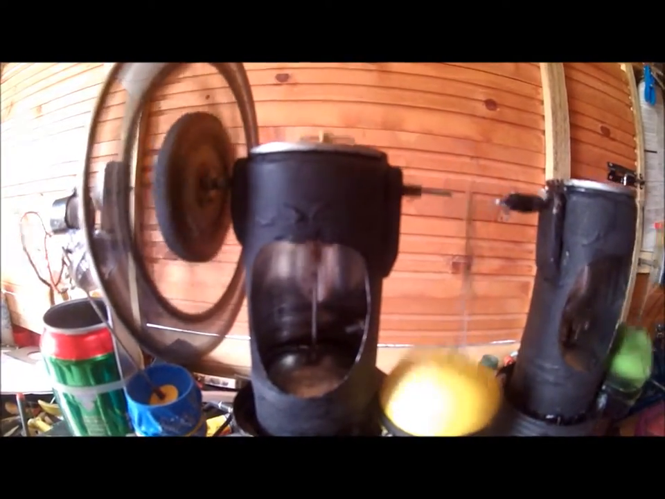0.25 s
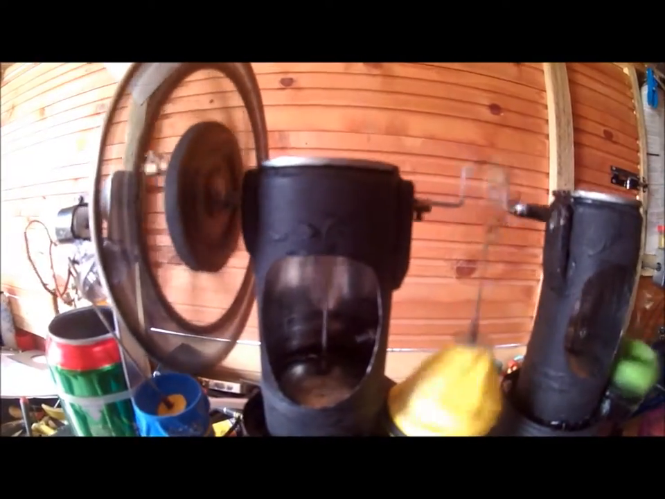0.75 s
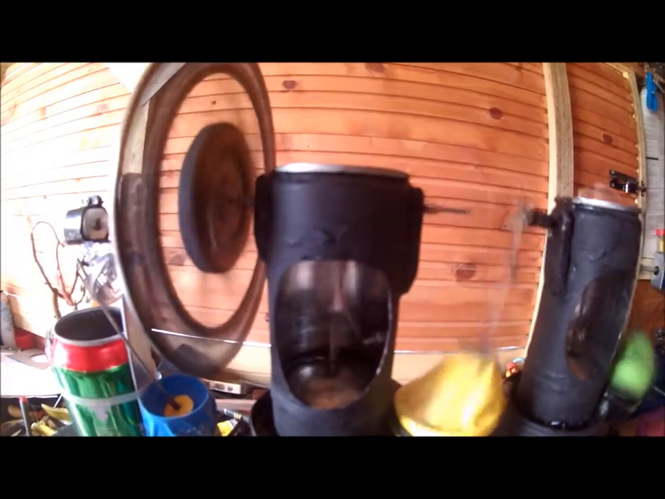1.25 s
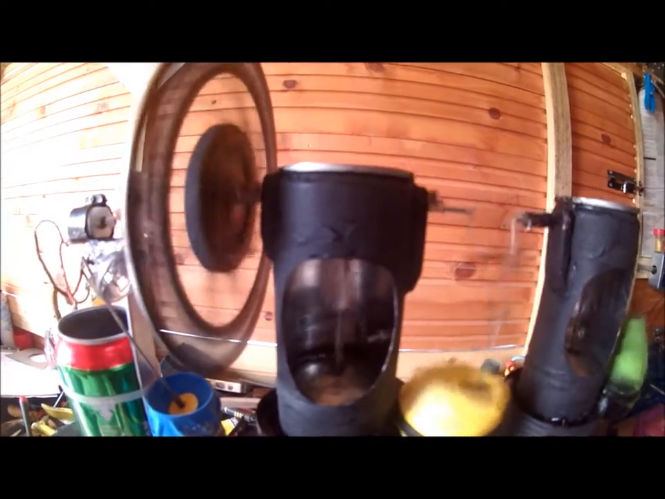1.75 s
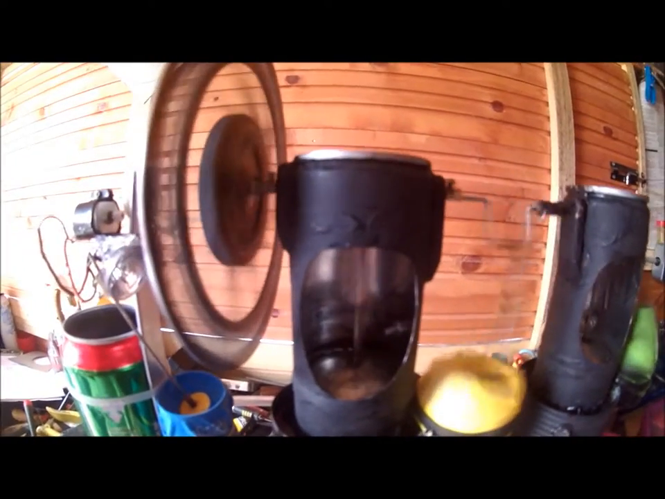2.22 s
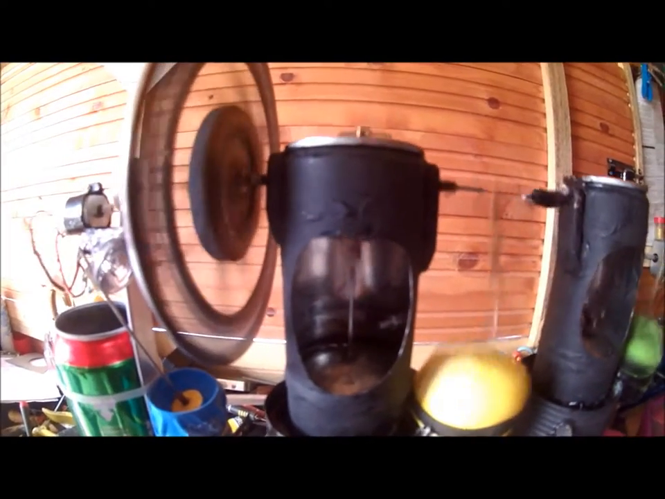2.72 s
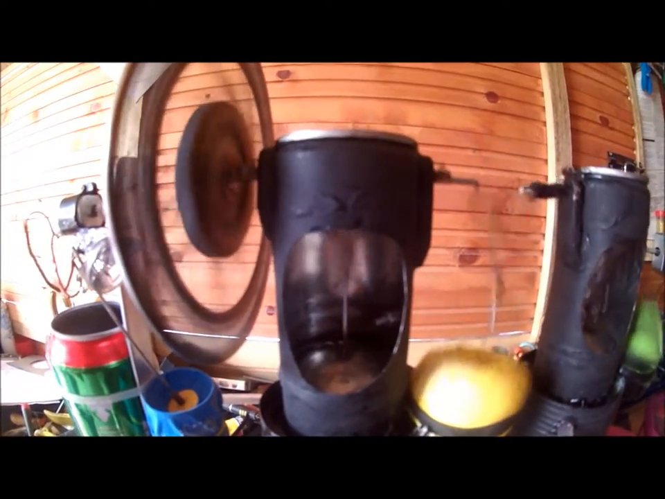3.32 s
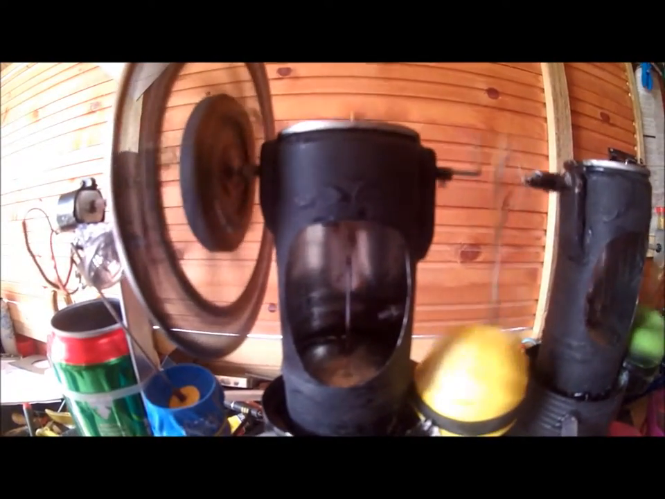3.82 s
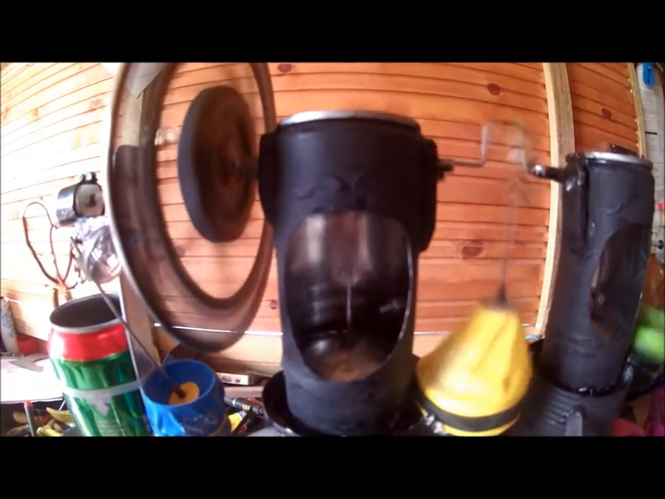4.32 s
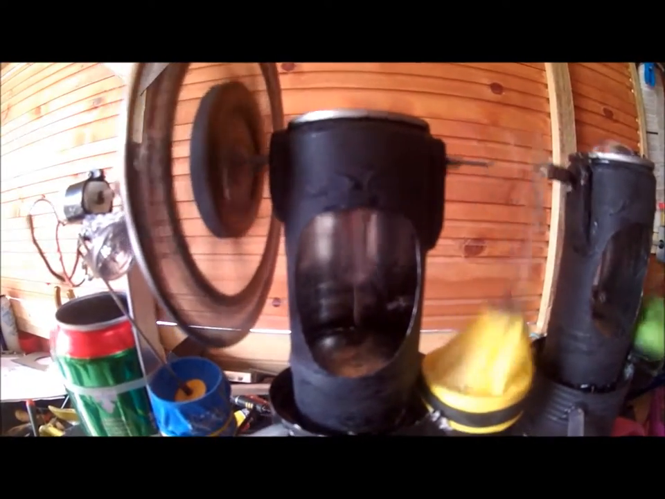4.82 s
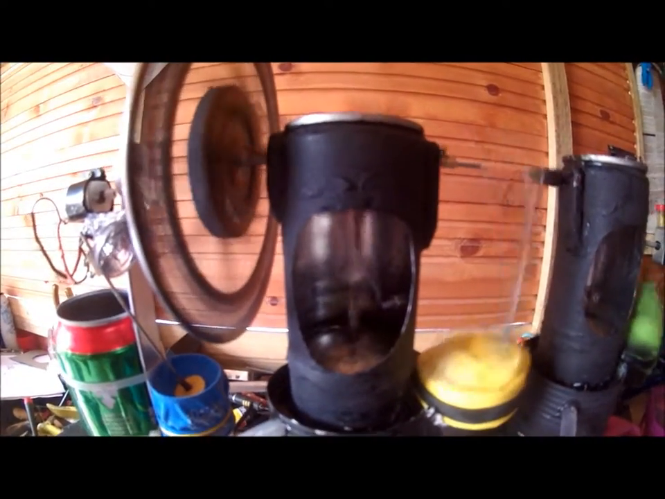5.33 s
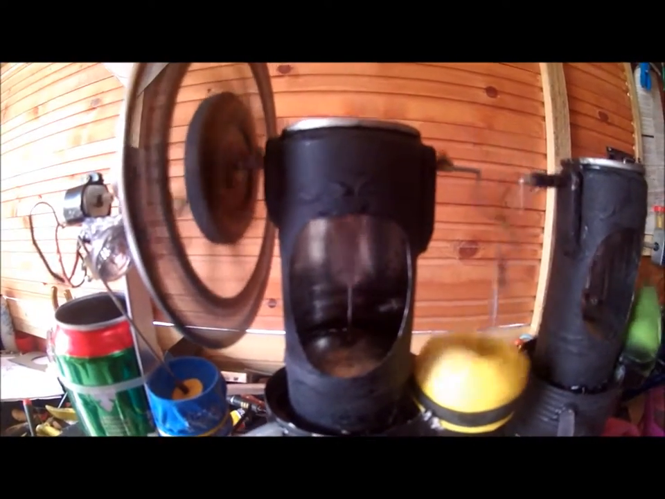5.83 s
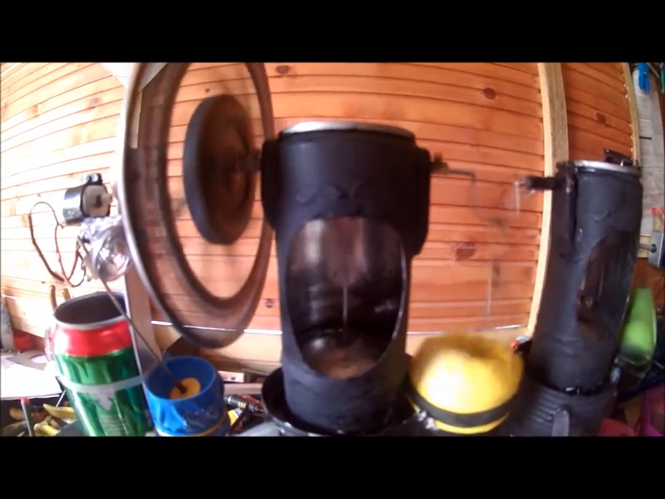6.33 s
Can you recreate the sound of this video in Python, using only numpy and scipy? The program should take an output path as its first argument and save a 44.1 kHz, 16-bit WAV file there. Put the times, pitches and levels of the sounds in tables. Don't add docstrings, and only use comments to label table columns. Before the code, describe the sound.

A small hot-air engine made from tin cans runs on a bench in a wooden shed. Six times a second a hard, tinny slam lands as a tight flurry of blows, with a dry crank tick and loose lid and wire rattle between. The cheap microphone sits very close, so the slams sound crunchy and overloaded; bass is thin and the room barely audible.

```python
import sys
import numpy as np
from scipy import signal
from scipy.fft import rfft, irfft
from scipy.io import wavfile
from scipy.ndimage import uniform_filter1d, minimum_filter1d

SR = 44100
rng = np.random.default_rng(int(sys.argv[2]) if len(sys.argv) > 2 else 0)


def boost_factor(decibels):
    exponent = np.asarray(decibels, float) / 20
    return 10 ** exponent


def int16_out(signal):
    q = np.round(np.clip(np.atleast_2d(signal).T, -1, 1) * 32767)
    wavfile.write(sys.argv[1], SR, q.astype(np.int16))


N = 289296

# turns counted, crank tick t/s
CRANK = [(0, -.0815), (5, .6935), (10, 1.4668), (15, 2.2402), (20, 3.0128), (23, 3.4803), (25, 3.7928),
         (30, 4.5843), (33, 5.057), (38, 5.8416), (43, 6.626)]
TICKS = np.interp(np.arange(CRANK[-1][0] + 1), *np.transpose(CRANK))
# first hard blow t/s, flurry
# length/s, shove level/dB, can ring f/Hz, lid level beside the can/dB
SLAM_ROWS = [(0.0161, 0.0086, -29.5, 1342, -7.5), (0.1723, 0.0152, -31, 1244, -14.5),
             (0.3284, 0.012, -42, 1010, -4), (0.4798, 0.013, -37.5, 1310, -15),
             (0.6384, 0.0115, -33, 1130, -8), (0.7911, 0.011, -32.5, 1400, 0.5),
             (0.9441, 0.0148, -32.5, 1367, 1), (1.1023, 0.0126, -43, 1247, -17.5),
             (1.2521, 0.01, -33, 1305, 2.5), (1.4083, 0.013, -31.5, 1378, 4),
             (1.5622, 0.015, -33.5, 1332, -1), (1.7167, 0.0142, -40.5, 1060, 0.5),
             (1.8719, 0.0133, -41, 1060, -2), (2.0268, 0.0154, -42, 1166, -5.5),
             (2.1811, 0.018, -36.5, 1325, 3), (2.336, 0.013, -33, 1315, -6.5),
             (2.4906, 0.0147, -39, 1230, 0), (2.646, 0.0123, -42.5, 1310, -1),
             (2.7987, 0.0144, -39, 1380, 0), (2.9581, 0.0154, -32.5, 1274, -0.5),
             (3.1113, 0.0132, -31, 1270, -5),
             (3.2706, 0.0148, -33.5, 1254, -6.5), (3.4253, 0.0113, -28.5, 1380, -10),
              (3.5777, 0.0125, -35.5, 1400, -3.5), (3.7345, 0.0155, -36, 1398, -7),
              (3.8944, 0.0132, -37, 1028, -7.5), (4.051, 0.0143, -36, 1319, -17.5),
              (4.2116, 0.0165, -37.5, 1060, -2.5), (4.3635, 0.0168, -39.5, 1248, -6.5),
              (4.528, 0.0171, -30.5, 1240, -4.5), (4.6804, 0.019, -36, 1052, -0.5),
              (4.8434, 0.0124, -35, 1308, -4.5), (4.9983, 0.011, -37, 1318, -9),
              (5.16, 0.0144, -32, 1290, -7), (5.3128, 0.018, -37, 1060, -10.5),
              (5.468, 0.0136, -34.5, 1267, -13), (5.6291, 0.017, -35.5, 1060, -2.5),
              (5.788, 0.01, -29.5, 1360, -8), (5.9422, 0.0159, -40, 1308, -7),
              (6.0972, 0.0115, -38, 1074, -1), (6.2554, 0.0154, -35, 1090, 0),
              (6.409, 0.019, -34, 1093, -5)]
SLAMS = SLAM_ROWS
MEAN_SHOVE_DB = -36


def flurries():
    # place/share of its length, level/dB, extra lid level/dB, wire jingle level/dB
    flurry_blows = [
        (-.38, -17, 1.5, -20),
        (0, 0, 2.5, -11.5),
        (0.451, 1, 1.5, -8),
        (0.899, -2, -1.5, -26),
        (1.501, -12.5, 0, -22.5),
    ]
    off_centre_hz = [1060, 1230, 1310, 1380]
    # t/s, level/dB, ring f/Hz
    stray_knocks = [(0.0754, -8.5, 1230), (0.2355, -10.5, 1170), (1.129, -11.5, 1310), (4.35, -7, 1290),
                    (4.6684, -8.5, 1330), (5.377, -12, 1122), (5.5321, -8.5, 1265)]
    place_scatter, blow_scatter_db, jingle_scatter_db = 0.14, 4.5, 10
    blow_per_shove = 0.35
    jingle_per_lid = -0.53
    touch_gain, first_loss = 1.6, 1.3
    rows = []
    all_draws = rng.random((len(SLAMS), len(flurry_blows), 4)) - 0.5
    for (s, length, shove_db, can_hz, lid_db), draws in zip(SLAMS, all_draws):
        for (place, db, extra_db, jingle_db), u in zip(flurry_blows, draws):
            blow_s = s + length * (place + place_scatter * u[0])
            blow_db = db + blow_per_shove * (shove_db - MEAN_SHOVE_DB) + blow_scatter_db * u[1]
            if place < 0:
                blow_db += touch_gain * s
            if place == 0:
                blow_db -= first_loss * s
            hard = db > -2
            hz = can_hz if hard else off_centre_hz[int((u[2] + 0.5) * len(off_centre_hz))]
            wire_db = jingle_db + jingle_per_lid * (lid_db + 5.5) + jingle_scatter_db * u[3]
            rows.append((blow_s, blow_db, hz, lid_db + extra_db, wire_db))
    return rows + [(s, db, hz, -9, -20) for s, db, hz in stray_knocks]


def blows():
    out, rows = np.zeros(N), flurries()
    for (s, db, hz, lid_db, jingle_db), u in zip(rows, rng.random((len(rows), 4))):
        t60 = np.interp(db, [-8, -1], [0.02, 0.04])
        can = ring(hz, t60, 0.0005, u[0])
        lid = boost_factor(lid_db) * ring(1850 + 270 * u[1] ** 2, 0.013, 0.00074, u[2])
        tin = (can + lid) / np.hypot(1, boost_factor(lid_db))
        wire = ring(2800 + 800 * u[3], 0.0091, 0.00097, u[1])
        wire += 1.62 * rng.standard_normal(len(wire)) * ring(11500, 0.016, 0.00029)
        add(out, s - 0.0014, boost_factor(db - 2) * (tin + boost_factor(jingle_db) * wire))
    return out


def clicks():
    # t/s, click level/dB
    lid_play = [
        (0, -21),
        (3.1, -19),
        (3.4, -36.5),
        (4.3, -33),
        (4.8, -22),
        (5.9, -18.5),
        (6.05, -33),
        (6.56, -27),
    ]
    tick_scatter_db, lid_scatter_db, link_scatter_db = 2, 7, 5.5
    out = np.zeros(N)
    for s, lid_s, wire_s, u in zip(TICKS, at_angle(0.335), at_angle(0.455), rng.random((len(TICKS), 8))):
        lid_db = np.interp(lid_s, *np.transpose(lid_play)) + lid_scatter_db * (u[5] - 0.5)
        lid = ring(1900 + 60 * u[1], 0.011, 0.00046)
        add(out, lid_s + 0.0011 * u[0], boost_factor(lid_db + 2) * lid)

        tick = ring(1220, 0.009, 0.0007, 0.6)
        tick += 0.15 * ring(2000, 0.004, 0.0008)
        tick += 0.06 * ring(2800 + 700 * u[4], 0.012, 0.001)
        add(out, s - 0.0008, boost_factor(-8 + tick_scatter_db * (u[7] - 1)) * tick)

        link_db = -22 + link_scatter_db * (u[6] - 0.5)
        link = ring(3000 + 500 * u[2], 0.008, 0.00026)
        link += 1.2 * ring(3750 + 600 * u[3] ** 2, 0.031, 0.00023, u[1])
        link += 0.6 * ring(13000, 0.012, 0.0008)
        add(out, wire_s + 0.0011 * u[4], boost_factor(link_db - 3) * link)
        add(out, wire_s + 0.0036 + 0.0046 * u[3], boost_factor(link_db - 14) * link)
    return out


def can_rattle():
    # f/Hz, width/Hz, level/dB
    can_modes = [(560, 150, -57), (698, 61, -8.5), (822, 81, -9), (1045.4, 88, 0.5), (1170, 27, -4),
                 (1305, 35, -1.5), (1400, 22, -3.5), (1498, 82, -4.5)]
    # crank angle/turns, half width/turns, level/dB
    can_loose = [(0.032, 0.043, -21.5), (0.158, 0.07, -21.5), (.515, 0.043, -23.5), (0.639, 0.048, -11.5),
                 (.94, .035, -24)]
    return rattle(can_modes, -32.5, can_loose, per_s=1500, spread_db=2.2)


def lid_rattle():
    # f/Hz, width/Hz, level/dB
    lid_modes = [(1724, 140, 1.5), (1858.5, 70, 2.5), (1886, 15, -2.5), (2115, 39, -3.5), (2235, 410, 2.5),
                 (2420, 160, -8)]
    # crank angle/turns, half width/turns, level/dB
    lid_loose = [(.165, .045, -31.5), (0.501, .04, -32), (0.644, 0.059, -14), (0.829, 0.035, -31)]
    return rattle(lid_modes, -37, lid_loose, per_s=1900, spread_db=2.3)


def wire_rattle():
    # f/Hz, width/Hz, level/dB
    wire_modes = [(2760, 67, -13.5), (2952, 150, -2), (3520, 370, -4.5), (3270, 140, -4.5), (3920, 190, -1),
                  (4220, 160, -2), (5100, 1100, -0.5)]
    # crank angle/turns, half width/turns, level/dB
    wire_loose = [(.165, 0.022, -38), (.255, 0.026, -30), (.48, 0.054, -34), (.665, .035, -22),
                  (0.821, 0.026, -38.5), (.955, 0.041, -32)]
    return rattle(wire_modes, -41.5, wire_loose, per_s=3000, spread_db=2.6)


def pivot_rattle():
    # f/Hz, width/Hz, level/dB
    pivot_modes = [(6470, 850, 1.5), (9500, 1800, 5.5), (10700, 760, 4.5), (11800, 570, -0.5),
                   (12700, 2900, -0.5), (15000, 2000, -0.5)]
    # crank angle/turns, half width/turns, level/dB
    pivot_loose = [(.005, .012, -34), (.19, .03, -35), (0.254, 0.02, -23), (0.316, 0.02, -27),
                   (0.461, .02, -32), (0.531, 0.021, -29), (0.664, 0.06, -23.5), (.835, 0.023, -29),
                   (0.954, 0.014, -34)]
    return rattle(pivot_modes, -39.5, pivot_loose, per_s=5000, spread_db=3)


def rattle(modes, rest_db, loose_at, per_s, spread_db):
    angle = np.arange(1000) / 1000
    power = boost_factor(2 * rest_db)
    for at, half_width, db in loose_at:
        past = (angle - at + 0.5) % 1 - 0.5
        reach = half_width * np.where(past < 0, 0.67, 1.3)
        power = power + boost_factor(2 * db) * np.exp(-2 * (past / reach) ** 2)
    level = np.interp(crank_angle() % 1, angle, np.sqrt(power))
    play = uniform_filter1d(uniform_filter1d(rng.standard_normal(N), 400), 400)
    play_db = 1.5 * play / play.std()
    contacts = rng.random(N) < per_s / SR
    size = boost_factor(spread_db * np.minimum(rng.exponential(1, N), 4)) * contacts
    drive = size / np.sqrt(np.mean(size ** 2)) * level * boost_factor(play_db)
    out = np.zeros(N)
    for hz, width, db in modes:
        r = np.exp(-np.pi * width / SR)
        pole = r * np.exp(2j * np.pi * hz / SR)
        mode = signal.lfilter([1], [1, -pole], drive * rng.standard_normal(N)).imag
        out += boost_factor(db) * np.sqrt(2 * (1 - r * r)) * mode
    return out / np.linalg.norm(boost_factor([m[2] for m in modes]))


def ring(hz, t60, rise, phase=0):
    t = np.arange(2600) / SR
    shape = (1 - np.exp(-(t / rise) ** 2)) * boost_factor(-60 * t / t60)
    return shape / shape.max() * np.sin(2 * np.pi * (hz * t + phase))


def crank_angle():
    return np.interp(np.arange(N) / SR, TICKS, np.arange(len(TICKS)))


def at_angle(turns):
    return TICKS[:-1] + turns * np.diff(TICKS)


def add(mix, s, sound):
    if 0 <= s < N / SR:
        part = mix[round(s * SR):][:len(sound)]
        part += sound[:len(part)]


def read(points, hz):
    f, value = np.transpose(points)
    return np.interp(np.log(hz + 1), np.log(f + 1), value)


def thuds():
    out = boost_factor(-44) * signal.lfilter([0.05], [1, -0.95], rng.standard_normal(N))
    for (s, length, shove_db, _, _), u in zip(SLAMS, rng.random((len(SLAMS), 2))):
        push = boost_factor(1.4 * (shove_db - MEAN_SHOVE_DB) - 26) * signal.windows.hann(110)
        add(out, s + 0.2 * length, push)
        add(out, s + 0.18 * length + 0.005 + 0.005 * u[0], (0.9 * u[1] - 0.3) * push)
    return out


def shed(x):
    # f/Hz, t60/s
    shed_t60 = [(250, 0.048), (1200, 0.18), (4000, 0.046), (12000, 0.11)]
    taps = np.zeros(SR // 2)
    at = np.arange(120, len(taps) - 22, 22)
    taps[at + rng.integers(0, 22, len(at))] = rng.choice([-1., 1.], len(at))
    hz, t, z = signal.stft(taps, SR, nperseg=256)
    decay = boost_factor(-60 * t / read(shed_t60, hz)[:, None])
    tail = signal.istft(z * decay, SR, nperseg=256)[1]
    return signal.fftconvolve(x, tail / np.linalg.norm(tail))[:N]


def scene():
    engine = blows() + clicks()
    engine += can_rattle() + lid_rattle() + wire_rattle() + pivot_rattle()
    engine = signal.sosfilt(signal.butter(4, 570, "high", fs=SR, output="sos"), engine)
    return (engine + boost_factor(-18.5) * shed(engine))[None]


def roll_off(x):
    return signal.sosfilt(signal.butter(12, 15800, fs=SR, output="sos"), x)


def record(dry):
    # f/Hz, level/dB
    mic_colour = [(20, -2), (3000, 3.5), (4500, -9), (5500, -21.5), (6300, -40.5), (7000, -33),
                  (7600, -39.5), (8050, -50.5), (8500, -39.5), (9500, -31), (11000, -26.5), (13000, -32.5),
                  (15650, -39), (15950, -66.5), (22000, -89.5)]
    ceiling, knee = 0.86, 7
    loud = dry / (1 + abs(dry / ceiling) ** knee) ** (1 / knee)
    hiss = boost_factor(-47) * np.diff(rng.standard_normal(N + 1))
    colour = boost_factor(read(mic_colour, np.fft.rfftfreq(N, 1 / SR)))
    x = irfft(rfft(loud + hiss + thuds()) * colour, N)
    room_left = minimum_filter1d(np.minimum(1, 0.96 / (abs(x) + 1e-9)), 121)
    x = x * uniform_filter1d(uniform_filter1d(room_left, 61), 61)
    return roll_off(x)


dry = scene()
out = record(dry)
int16_out(out)
```